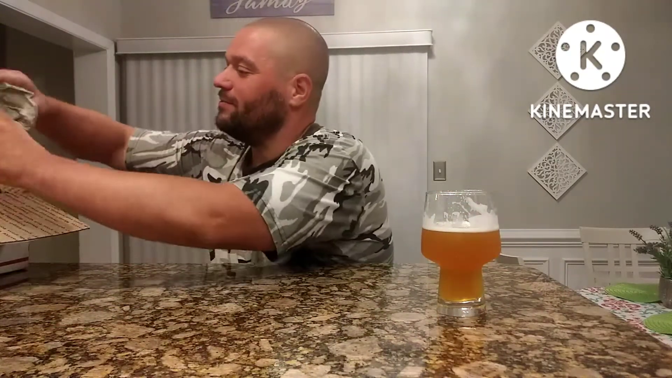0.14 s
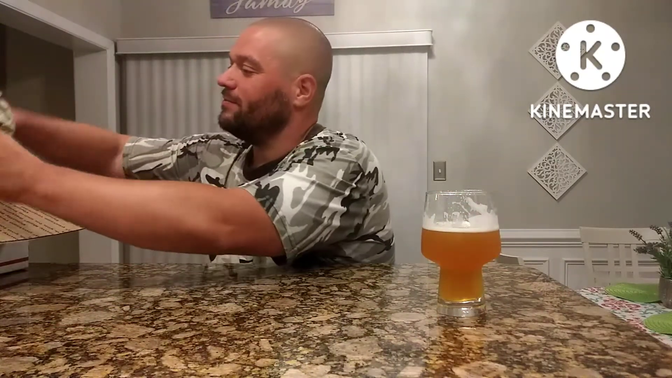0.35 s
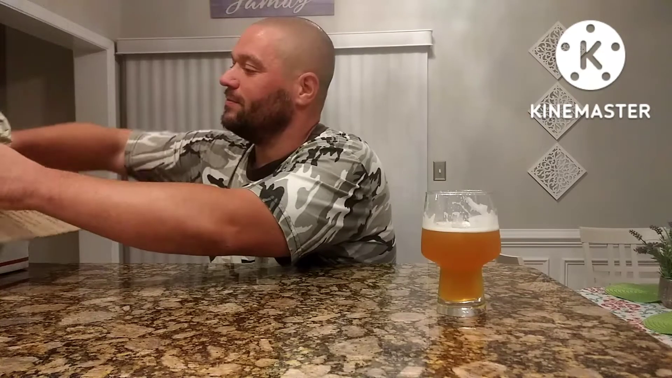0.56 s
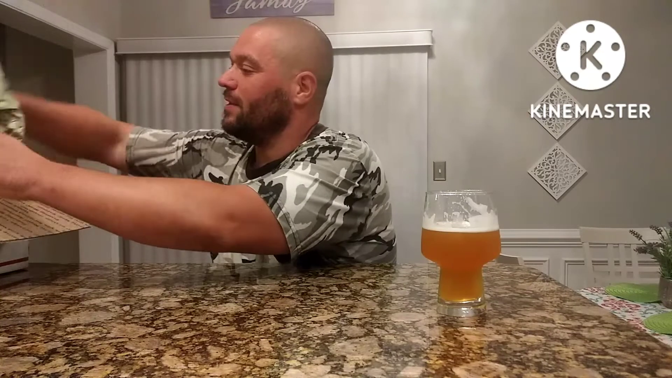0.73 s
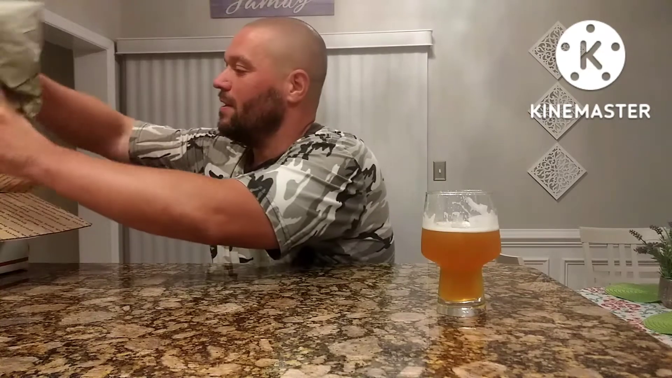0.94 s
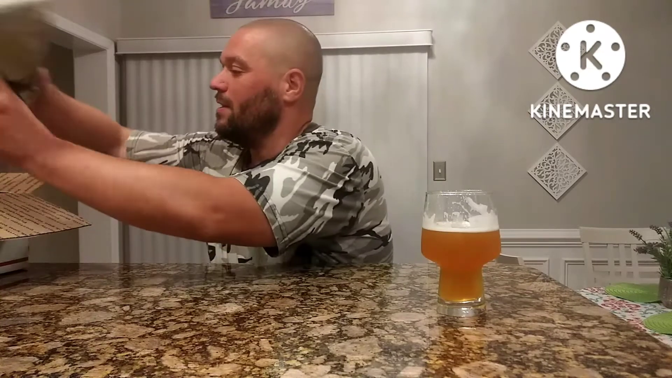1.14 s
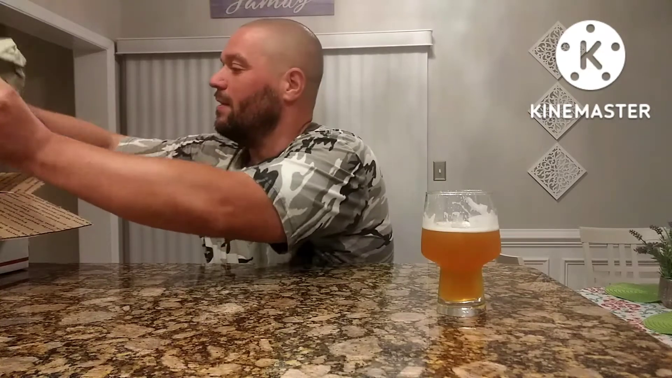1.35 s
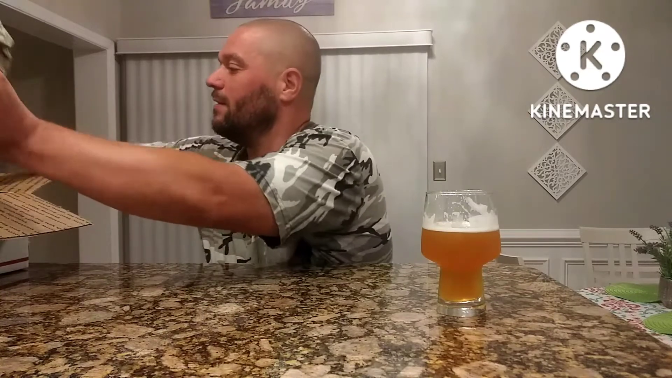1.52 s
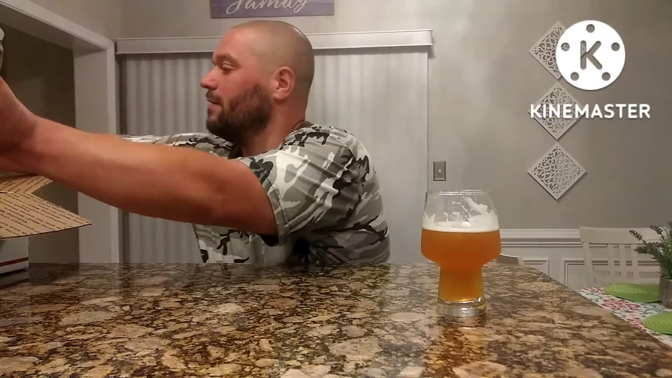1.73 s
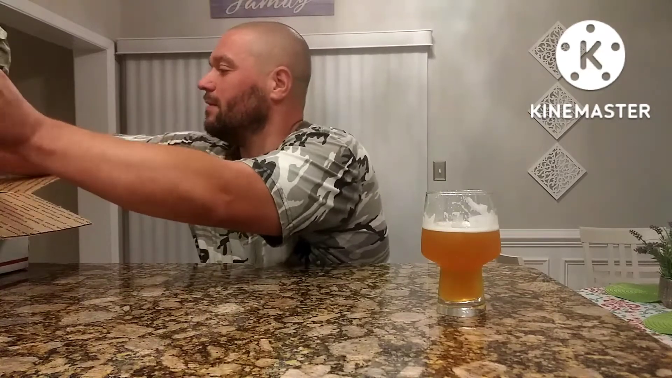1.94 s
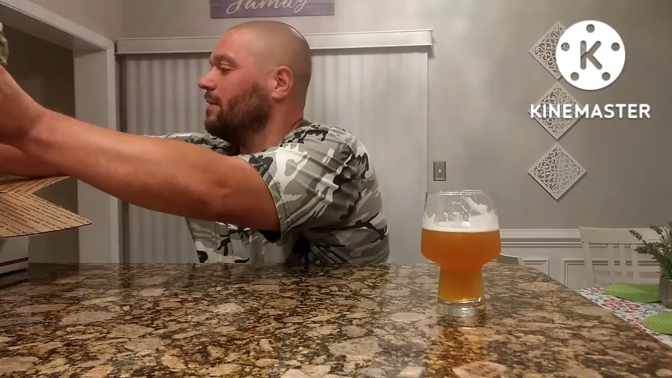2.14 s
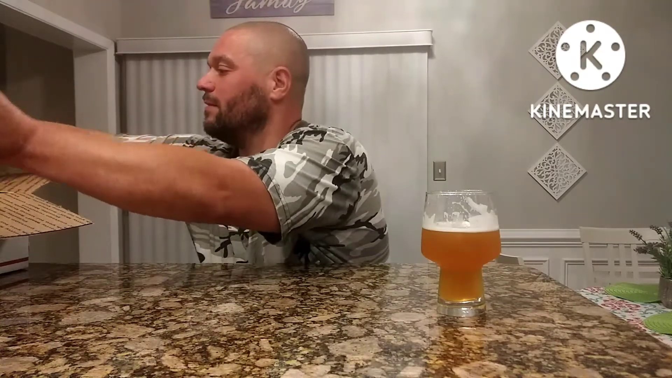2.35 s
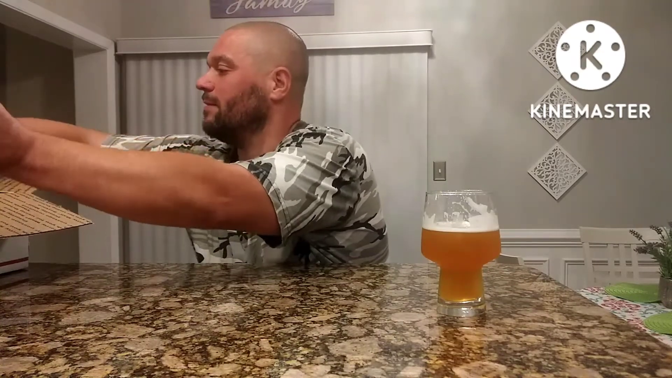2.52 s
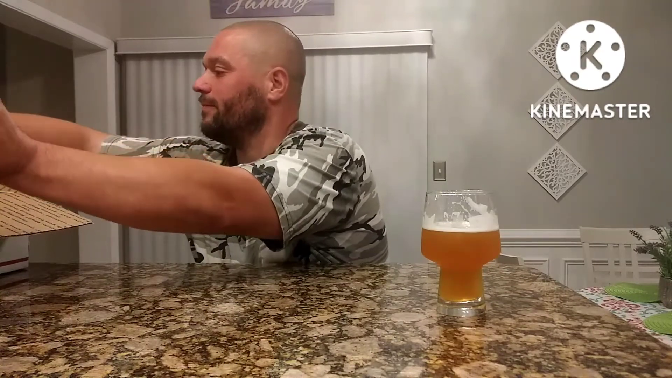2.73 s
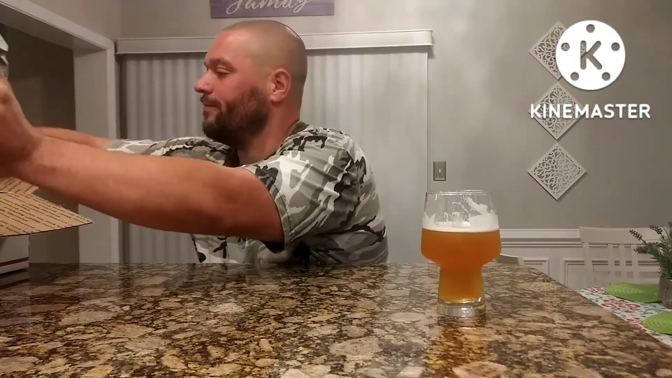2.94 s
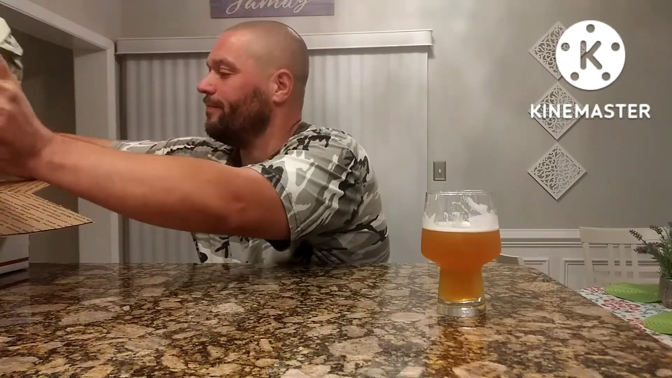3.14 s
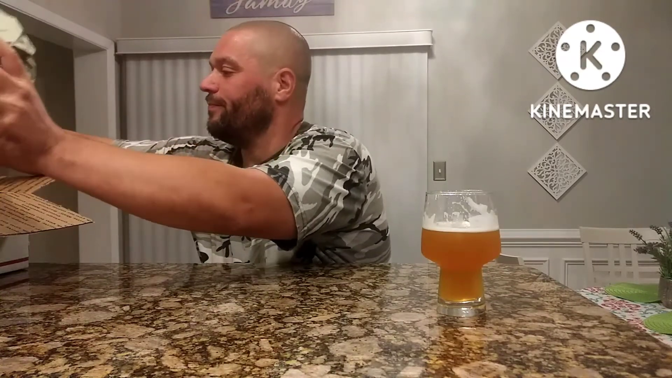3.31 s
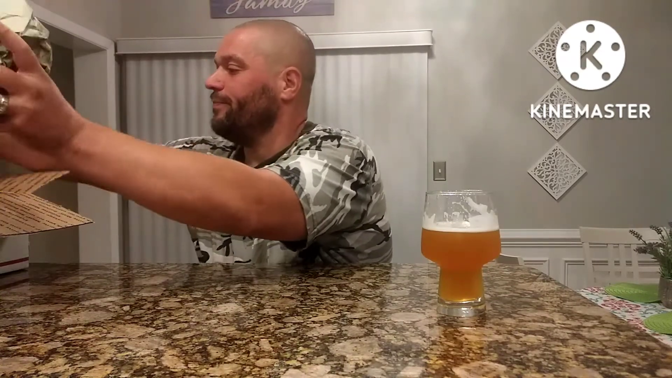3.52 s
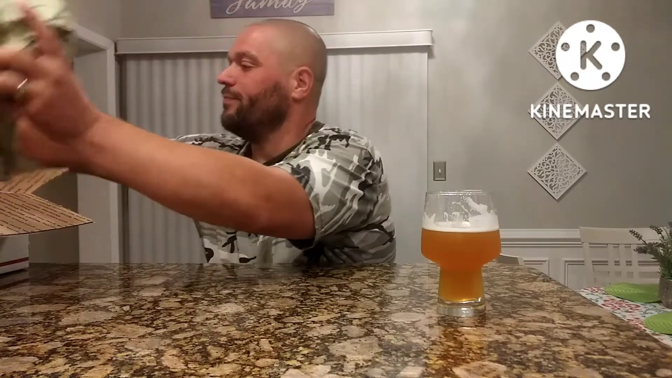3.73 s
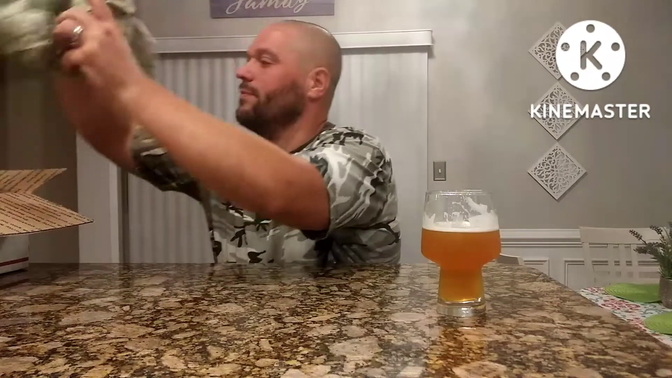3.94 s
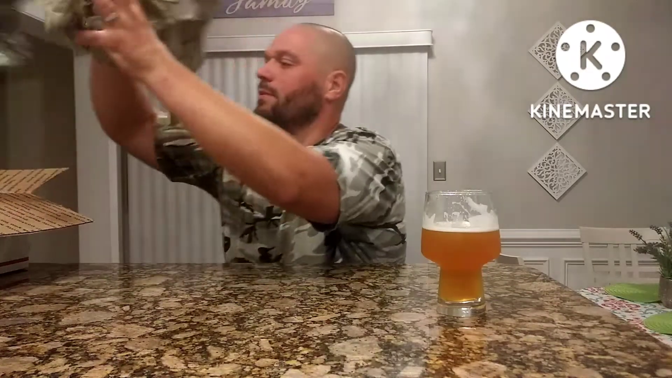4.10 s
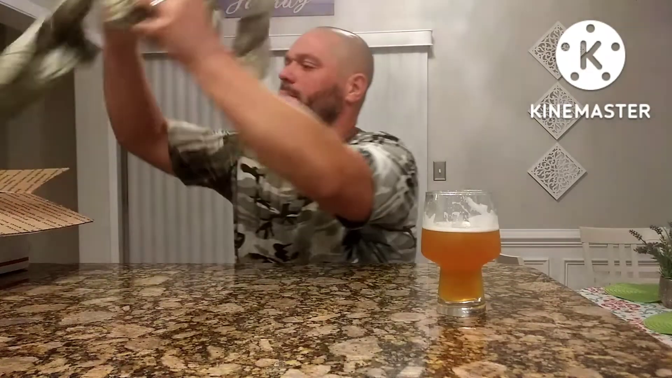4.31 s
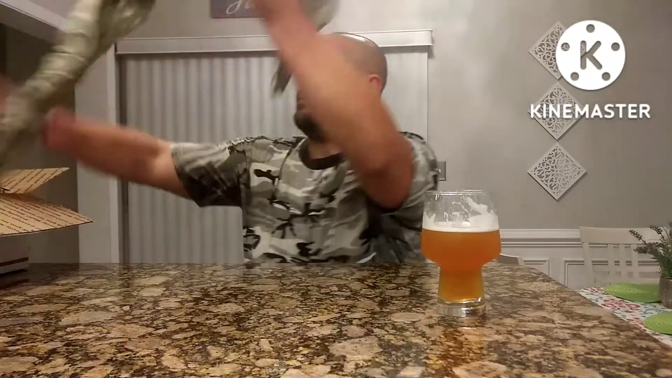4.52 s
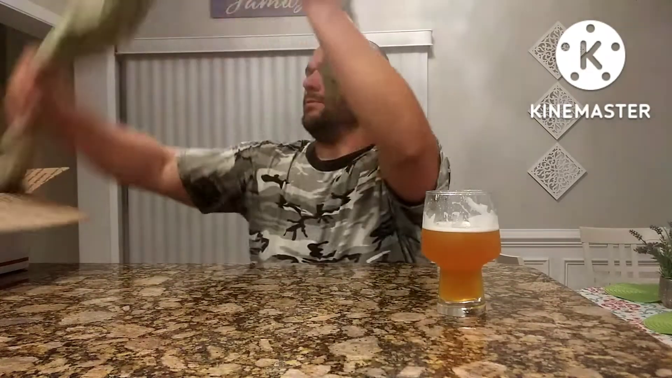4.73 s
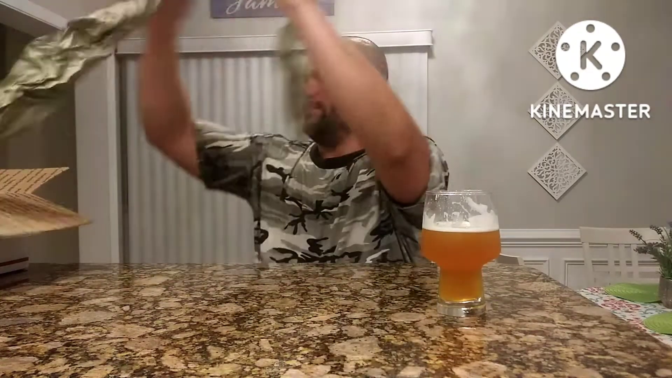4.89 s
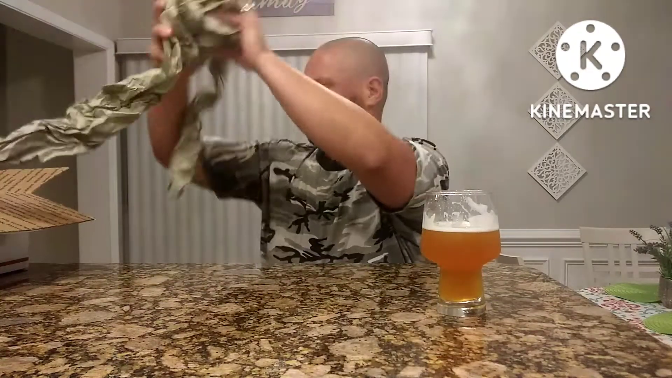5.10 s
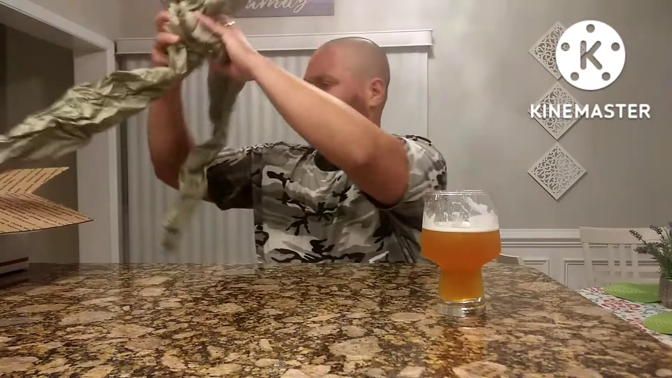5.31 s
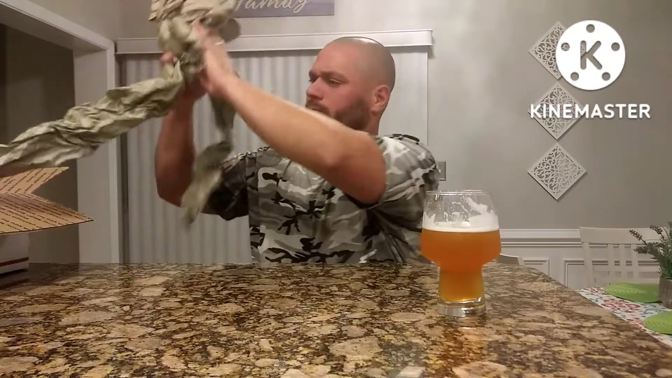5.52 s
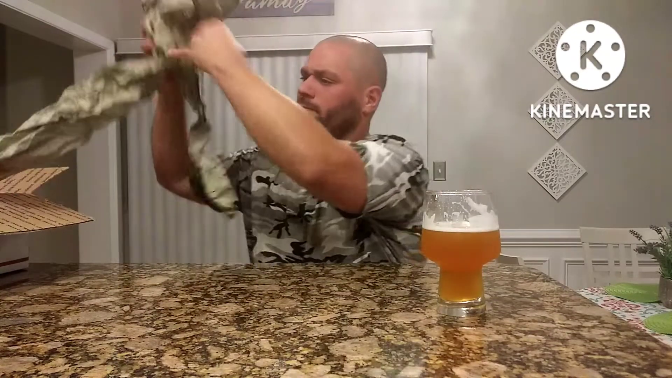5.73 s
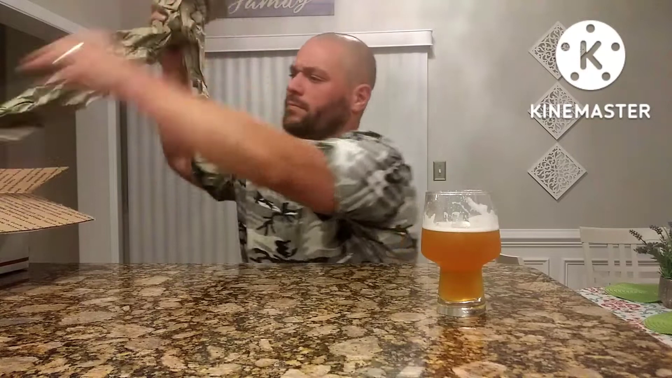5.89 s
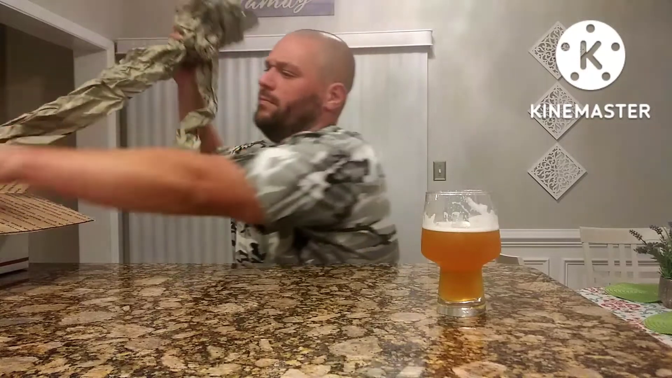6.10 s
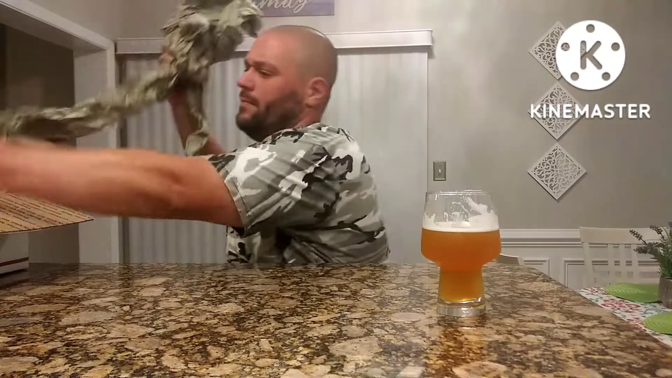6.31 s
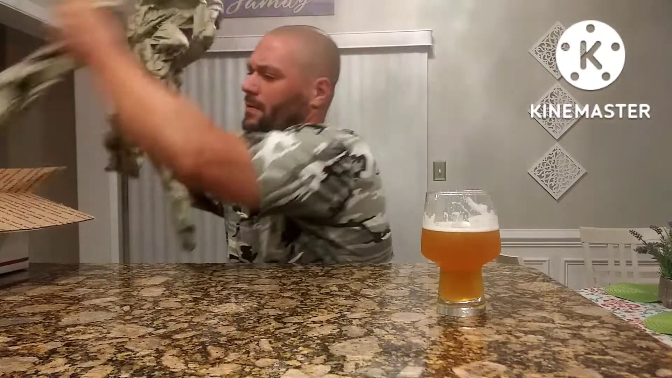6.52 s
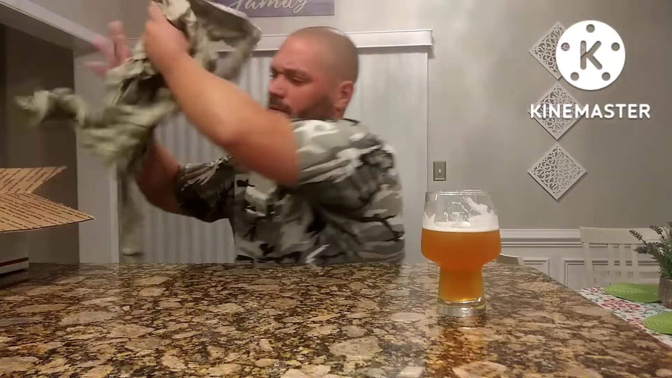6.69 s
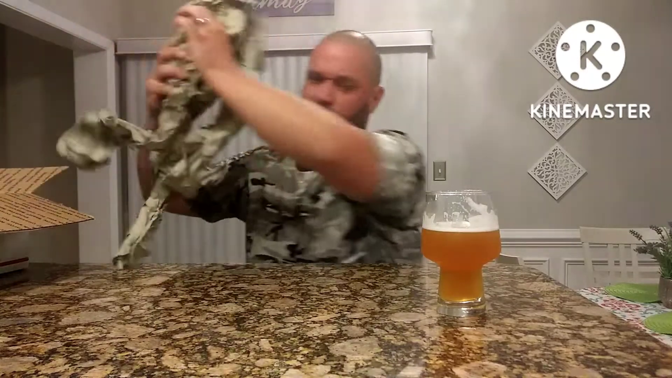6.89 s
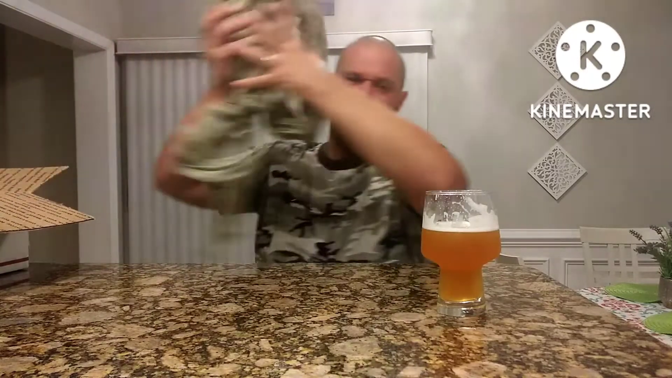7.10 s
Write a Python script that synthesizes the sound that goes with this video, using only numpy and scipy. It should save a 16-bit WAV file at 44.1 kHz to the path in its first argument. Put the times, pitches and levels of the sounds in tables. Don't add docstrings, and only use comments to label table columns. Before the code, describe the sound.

Crumpled paper is tugged from a cardboard box with fizzing crackles, sharp creasing snaps and dull box knocks, over a faint fridge hum.

```python
import sys
import numpy as np
from scipy import signal
from scipy.fft import rfft
from scipy.io import wavfile
from scipy.ndimage import uniform_filter1d

SR = 44100
rng = np.random.default_rng(int(sys.argv[2]) if len(sys.argv) > 2 else 0)


def rack_gain(trim_db):
    fader = np.asarray(trim_db, float)
    return 10 ** (fader / 20)


def generate_wav(signal):
    frames = np.transpose(np.atleast_2d(signal))
    scaled = np.clip(frames, -1, 1) * 32767
    pcm = np.round(scaled).astype(np.int16)
    wavfile.write(sys.argv[1], SR, pcm)


N = 315304

# start in seconds, peak in dB, pitch in Hz, sharp edge over the peak in dB.
SNAPS = [(.0629, -34, 5110, -16), (.1428, -25, 2650, -10), (.1716, -22, 4670, -15), (.6522, -22, 3790, -15),
         (.8746, -26, 5110, -20), (1.0395, -22, 3950, -14), (1.0956, -19, 5260, -13),
         (1.2327, -22, 5110, -11), (1.2967, -25, 1970, -9), (1.3871, -19, 4120, -9),
         (1.6779, -17, 3400, -18), (2.2825, -26, 2830, -14), (2.5991, -26, 2700, -13),
         (3.0185, -22, 4110, -8), (3.1611, -24, 5570, -10), (3.6977, -19, 4790, -13),
         (4.1046, -17, 4460, -23), (4.2446, -16, 4580, -24), (4.2594, -17, 4600, -14),
         (4.5579, -21, 4610, -13), (4.6282, -16, 3600, -10), (4.643, -18, 4600, -20),
         (4.7726, -21, 1510, -12), (5.1403, -20, 5340, -19), (5.4077, -19, 3010, -11),
         (5.5049, -16, 2450, -19), (6.3193, -16, 3890, -18), (6.3333, -14, 2950, -21),
         (6.4958, -19, 4780, -14), (6.6574, -20, 4230, -16)]
# start in seconds, peak in dB.
TICKS = [(0.1062, -41), (0.2522, -35), (0.4124, -48), (0.7585, -39), (0.986, -42), (1.0321, -31),
         (1.1578, -27), (1.2615, -40), (1.3259, -31), (1.3633, -24), (1.9704, -43), (2.2757, -29),
         (2.4034, -30.5), (2.4114, -34), (2.9256, -36), (3.1044, -43), (3.2587, -46), (3.7269, -41),
         (3.7593, -42), (3.8272, -37), (4.2928, -35.5), (4.4331, -31), (4.7184, -33), (4.8973, -32),
         (5.0564, -40), (5.6714, -33), (6.0906, -42.5), (6.4019, -24), (6.7654, -39), (6.8373, -36)]
# frequency in Hz, t60 in seconds.
DECAY = [(200, 0.27), (700, 0.46), (2000, 0.51), (5000, 0.53), (12000, 0.29)]
# lower edge in Hz, upper edge in Hz.
PASS_HZ = [270, 15600]


def evened(x):
    return x / np.sqrt(np.mean(x ** 2) + 1e-20)


def read(points, hz):
    f, value = np.transpose(points)
    return np.interp(np.log(hz + 1), np.log(f + 1), value)


def coloured(x, points):
    hz = np.abs(np.fft.fftfreq(4096, 1 / SR))
    log_gain = np.log(rack_gain(np.maximum(read(points, hz), -100)))
    taps = np.fft.ifft(np.exp(np.conj(signal.hilbert(log_gain)))).real
    return signal.oaconvolve(x, taps[:2048])[:len(x)]


def wander(per_s):
    size = round(SR / per_s)
    once = uniform_filter1d(rng.standard_normal(N), size)
    return evened(uniform_filter1d(once, size))


def add(mix, start_s, sound):
    part = mix[round(start_s * SR):][:len(sound)]
    part += sound[:len(part)]


def fridge():
    # frequency in Hz, level in dB.
    hum_lines = [(120, -89.5), (193, -90.5)]
    # frequency in Hz, density in dB per Hz.
    air_colour = [(30, -2), (60, -10), (130, 4), (400, 2), (1500, 6.5), (6000, -0.5), (15000, -7)]
    air_db = -65.5
    t = np.arange(N) / SR
    hum = np.zeros(N)
    for hz, db in hum_lines:
        hum += np.sqrt(2) * rack_gain(db + 0.83 * wander(6.0)) * np.sin(2 * np.pi * hz * t)
    return hum + rack_gain(air_db) * evened(coloured(rng.standard_normal(N), air_colour))


def standing(x):
    level_db, upper_edge_hz = -3.5, 2050
    stay = 24000
    onset = 200
    places, out = np.arange(-stay, N, stay), np.zeros(N)
    hz, t, z = signal.stft(rng.standard_normal((len(places), SR // 2)), SR, nperseg=256)
    fade = rack_gain(-60 * t / read(DECAY, hz)[:, None])
    low_pass = np.sqrt(1 + (hz[:, None] / upper_edge_hz) ** 2)
    tails = signal.istft(z * fade / low_pass, SR, nperseg=256)[1][:, onset:]
    tails = tails / np.sqrt(np.mean(abs(rfft(tails)[:, 100:400]) ** 2))
    for start, tail in zip(places, tails):
        at = np.arange(max(start, 0), min(start + 2 * stay, N))
        window = np.sin(np.pi * (at - start) / (2 * stay))
        add(out, (at[0] + onset) / SR, signal.fftconvolve(x[at] * window, tail))
    return rack_gain(level_db) * out


def kitchen(x):
    tail_db = -.5
    hz, t, z = signal.stft(x, SR, nperseg=256, noverlap=192)
    keep = rack_gain(-2 * 60 * (t[1] - t[0]) / read(DECAY, hz))
    power = np.array([signal.lfilter([0, 0, 0, 1 - k], [1, -k], abs(row) ** 2) for k, row in zip(keep, z)])
    chance = rng.standard_normal((len(t), len(hz), 2)).T
    noise = np.sqrt(power) * (chance[0] + 1j * chance[1])
    tail = signal.istft(noise, SR, nperseg=256, noverlap=192)[1][:N]
    return x + rack_gain(tail_db) * evened(tail) * np.std(x) + standing(x)


def buckle(hz, cycles, start=0.):
    turns = np.arange(1, 1500) * hz / SR
    attack = 1 - np.exp(-turns / .3)
    ring = np.exp(-3 * turns / cycles) * np.sin(2 * np.pi * turns + start) * attack
    return ring / np.linalg.norm(ring)


def snaps():
    # start in seconds, peak in dB, pitch in Hz.
    knocks = [(0.428, -28, 883), (0.549, -25, 1040), (0.567, -17, 864), (1.034, -24, 1460),
              (2.981, -23, 696), (3.017, -27, 713), (3.026, -29, 702), (3.076, -28, 870),
              (3.272, -22, 1025), (3.744, -22, 1110), (3.86, -24, 1385), (4.033, -30, 1040),
              (4.202, -31, 1100), (4.622, -25.5, 904), (4.718, -22, 1041), (4.772, -25, 930),
              (5.271, -27, 965), (5.502, -31.5, 840), (5.539, -27, 1390), (5.557, -22, 1180),
              (5.625, -28, 1500), (5.684, -20, 1480), (6.288, -40, 970), (6.319, -25, 1260),
              (6.396, -40, 1050), (6.634, -27.5, 958), (6.656, -20.5, 1350), (6.692, -20, 1390),
              (6.723, -25, 1440), (6.87, -26, 1250)]
    # start in seconds, peak in dB, frequency in Hz.
    booms = [(0.547, -41, 1020), (.572, -38, 738.4), (3.021, -25.5, 727), (3.041, -36, 706),
             (3.07, -48, 855), (4.708, -37, 1035), (4.776, -33.5, 1047), (4.638, -43, 274),
             (3.011, -36, 170), (3.065, -42.5, 200), (4.909, -45, 186)]
    # delay in seconds, level in dB.
    reflections = [
        (.0031, -12),
        (.0091, -11),
        (.017, -12),
    ]
    knock_db = -5.5
    out, edge = np.zeros(N), buckle(8700, 3.2)
    edge = edge / abs(edge).max()
    for s, db, hz, edge_db in SNAPS:
        ring = buckle(hz, 2.6)
        add(out, s, rack_gain(db - 1.5) * (ring / abs(ring).max() + rack_gain(edge_db + 1.5) * edge))
    for s, db in TICKS:
        add(out, s, rack_gain(db) * edge)
    for s, db, hz in knocks:
        ring = buckle(hz, 9.5) + .5 * buckle(1.47 * hz, 4.5)
        add(out, s, rack_gain(db + knock_db) * ring / abs(ring).max())
    for s, db, hz in booms:
        ring = buckle(hz, .033 * hz) * np.minimum(np.arange(1499) / 130, 1)
        add(out, s, rack_gain(db) * ring / abs(ring).max())
    direct = out.copy()
    for s, db in reflections:
        add(out, s, rack_gain(db) * direct)
    return out


def avalanches():
    calm_s = .018
    shocks = np.zeros(N)
    shocks[[round(row[0] * SR) for row in SNAPS + TICKS]] = 1
    after = signal.lfilter([1], [1, -np.exp(-1 / (calm_s * SR))], shocks)
    return np.exp(.2 * wander(45) + .3 * wander(220)) * (1 + 1.1 * after)


def crowd(low_hz, high_hz, cycles, per_s, spread_db, clumps, count=12):
    # frequency in Hz, density in dB per Hz.
    paper_colour = [(59, -66), (100, -48), (214, -33), (281, -17.5), (354, -11.5), (587, -5), (666, -7.5),
                    (1060, -2.5), (1180, -4), (3040, 1), (3520, -1.5), (5040, 3.5), (11500, -12),
                    (15400, -19.5)]
    out = np.zeros(N)
    odds = np.cumsum(clumps) / clumps.sum()
    for hz in np.geomspace(low_hz, high_hz, count):
        when, sign, size = rng.random((12000, 3))[:round(per_s * N / SR / count)].T
        at = np.minimum(np.searchsorted(odds, when), N - 1)
        flips = np.zeros(N)
        flips[at] = np.sign(sign - .5) * rack_gain(spread_db * np.minimum(-np.log(size), 3.5))
        ring = buckle(hz, cycles, 2 * np.pi * rng.random())
        out += np.sqrt(hz) * signal.oaconvolve(flips, ring)[:N]
    return evened(coloured(out, paper_colour))


def boxed(x):
    # frequency in Hz, width in Hz, level over the bare paper in dB.
    box_modes = [(439, 25, 0), (563, 18, -3.5), (713, 24, -4), (884, 21, -2.5), (1000, 15, -13)]
    ringing = sum(rack_gain(db) * signal.lfilter(*signal.iirpeak(hz, hz / width_hz, SR), x)
                  for hz, width_hz, db in box_modes)
    return evened(x + ringing)


def effort(t, over_db, swell, drumming, tightness):
    # top in seconds, rise in seconds, fall in seconds, pull in dB, drumming of the walls in dB.
    box_tugs = [(.08, .25, .045, -48.5, -12), (.116, 0.02, 0.056, -35.5, -13),
                (.178, 0.037, .13, -34, -18.5), (.431, 0.054, .12, -32.5, -7),
                (.58, .075, 0.081, -26.5, -9), (.767, 0.27, 0.06, -36, -7), (.867, .08, 0.023, -36, -11),
                (1.05, 0.055, .077, -31, -30), (1.19, .25, .1, -31.5, -15.5), (1.329, .04, .054, -34, -12),
                (1.386, 0.09, 0.052, -30, -15), (1.54, .2, 0.098, -34.5, -11.5),
                (1.684, 0.076, 0.026, -35.5, -11), (1.829, 0.13, 0.07, -40, -7),
                (1.985, 0.094, 0.037, -40, -10.8), (2.14, 0.34, 0.35, -38.5, -6),
                (2.282, 0.044, 0.02, -38, -9), (2.371, 0.13, .096, -40.5, -2.5),
                (2.528, 0.05, 0.11, -36, -5.5), (2.63, .22, 0.62, -39, -9), (2.93, 0.024, 0.22, -36, -27),
                (3.042, 0.11, .095, -33, -4.5), (3.098, .04, 0.099, -40.5, 0.5),
                (3.268, 0.045, 0.07, -35, -4)]
    air_tugs = [(3.427, 0.06, 0.066, -42, -8.5), (3.548, 0.021, 0.5, -35.5, -10),
                (3.753, .19, .068, -31, -9), (3.833, 0.02, .18, -29.5, -12.5),
                (4.119, 0.21, 0.079, -28.5, -17), (4.312, 0.23, 0.1, -28, -19),
                (4.433, .066, .083, -31.5, -18), (4.561, 0.016, .1, -32.5, -15),
                (4.637, 0.05, 0.017, -31, -11), (4.71, 0.086, .29, -31, -15.5),
                (4.905, .022, 0.16, -31, -12), (4.953, 0.089, 0.18, -27, -17.5),
                (5.136, 0.036, 0.15, -32, -24), (5.421, .22, 0.06, -32.5, -25),
                (5.505, .025, .028, -38, -20), (5.661, 0.21, 0.047, -26.5, -16.5),
                (5.824, 0.13, 0.059, -28.5, -14.5), (5.945, .117, .044, -38.5, -15),
                (6.095, 0.1, 0.15, -34.5, -9), (6.322, 0.076, .034, -27, -10.5),
                (6.474, 0.39, .059, -30.5, -12), (6.678, .13, 0.19, -28.5, -14),
                (6.81, .15, 0.32, -33, -15), (7.138, 0.058, .069, -28.5, -11)]
    # time in seconds, tightness in dB.
    crushing = [(0, 1), (.45, -1.5), (.8, 0), (1.1, -5), (1.4, 2.5), (1.8, 2), (2.1, -4), (2.4, -2.5),
                (2.7, 3), (3.1, -2.5), (3.55, 4), (4.1, -1), (4.9, 2.5), (5.2, -7), (5.6, -3), (5.85, 2.5),
                (6.4, 1), (6.8, -2)]
    tug_db = 12
    roundness = 1.4
    power = 0
    for top, rise_s, fall_s, db, box_db in box_tugs + air_tugs:
        away = np.maximum((top - t) / rise_s, (t - top) / fall_s)
        power = power + rack_gain(2 * (db + drumming * box_db - swell * tug_db * away ** roundness))
    return np.sqrt(power) * rack_gain(over_db + tightness * np.interp(t, *np.transpose(crushing)))


def rustle():
    # lowest Hz, highest Hz, cycles a buckle rings, buckles per second, size spread in dB.
    families = [
        (2270, 5870, 1.9, 5000, 3.5),
        (200, 918, 3.8, 700, 3.5),
        (835, 1924, 2.93, 2200, 2.5),
        (7170, 18800, 2.8, 5300, 2.5),
    ]
    # level over the pull in dB, shares of the tug's swell, the drumming, the tightness.
    follow_shares = [(-3, 0.93, -0.031, -0.031), (-1.5, 1.15, 1.22, 0.46), (-4.5, 0.85, 0.22, -0.47),
                     (-12, 0.96, -0.064, 0.46)]
    t, coarse = np.arange(N) / SR, np.arange(0, N / SR + .01, .002)
    clumps = avalanches()
    out = np.zeros(N)
    for shares, family in zip(follow_shares, families):
        gain = np.interp(t, coarse, effort(coarse, *shares))
        out += gain * boxed(crowd(*family, clumps))
    return out


def scene():
    paper = kitchen(rack_gain(-5.0) * rustle() + snaps())
    high_pass = signal.butter(4, PASS_HZ[0], "high", fs=SR, output="sos")
    return np.array([signal.sosfilt(high_pass, paper) + fridge()] * 2)


def roll_off(x):
    return signal.sosfilt(signal.butter(12, 15680, fs=SR, output="sos"), x)


def record(dry):
    low_pass = signal.firwin(401, PASS_HZ[1], window=("kaiser", 9), fs=SR)
    return roll_off(signal.oaconvolve(dry, low_pass[None], "same"))


dry = scene()
out = record(dry)
generate_wav(out)
```